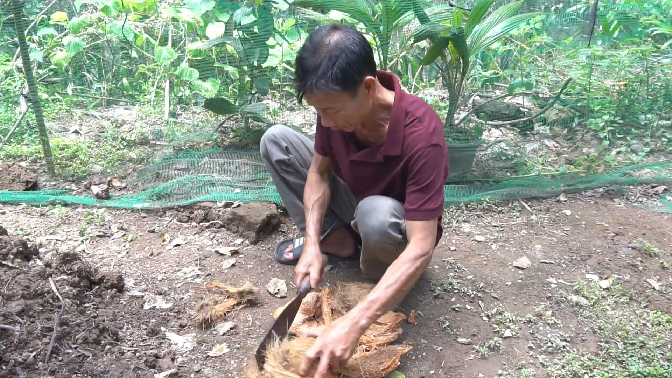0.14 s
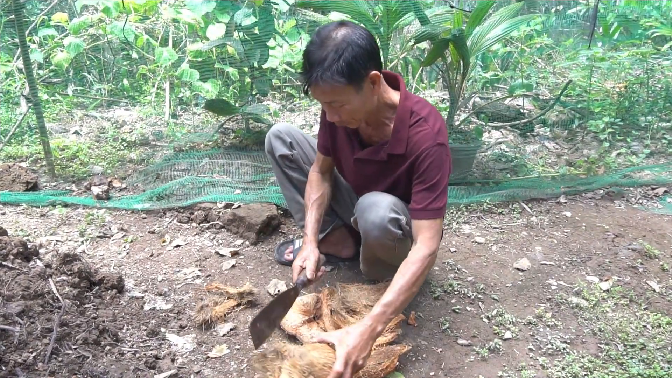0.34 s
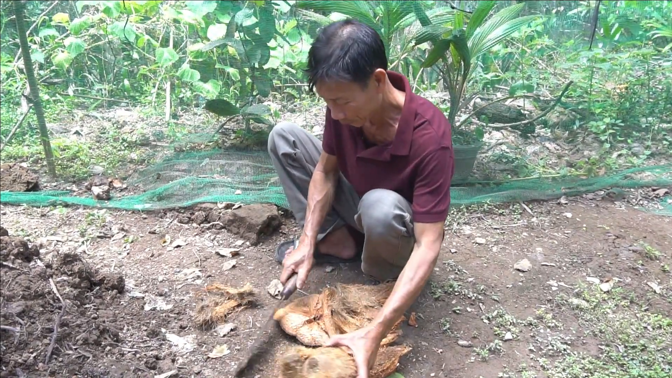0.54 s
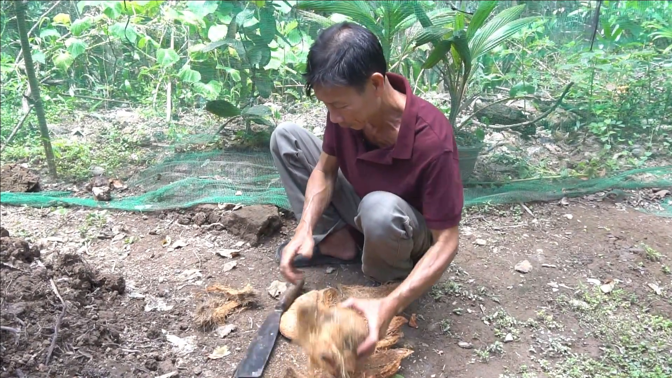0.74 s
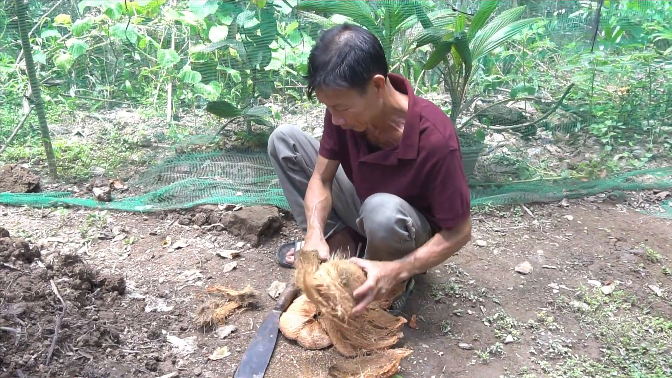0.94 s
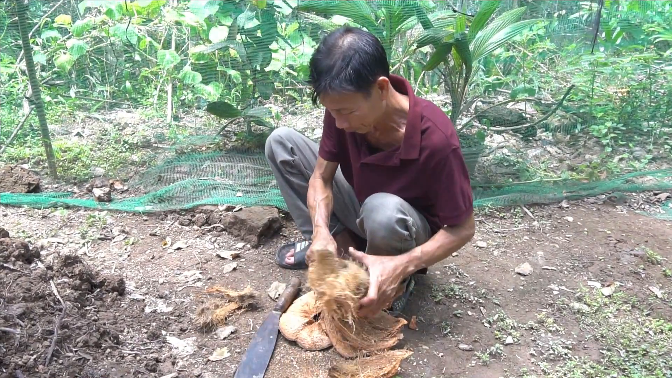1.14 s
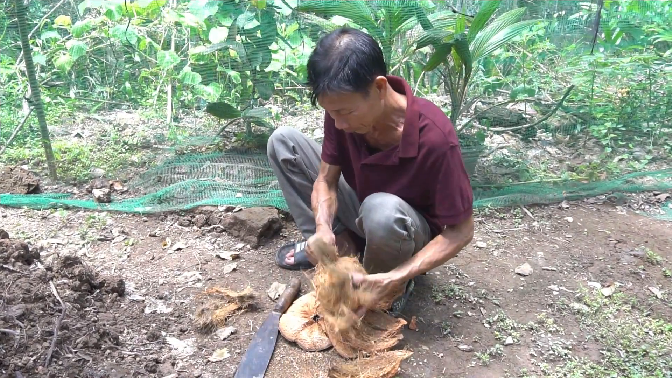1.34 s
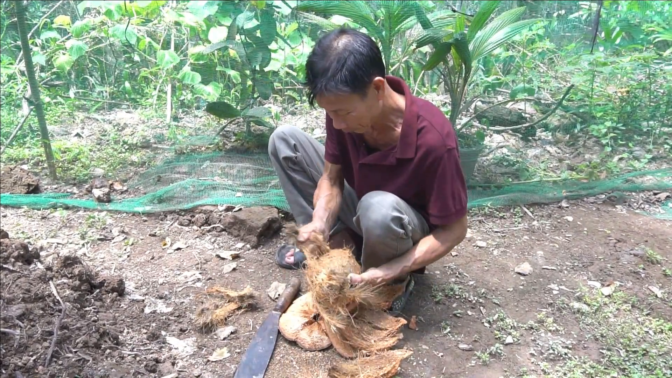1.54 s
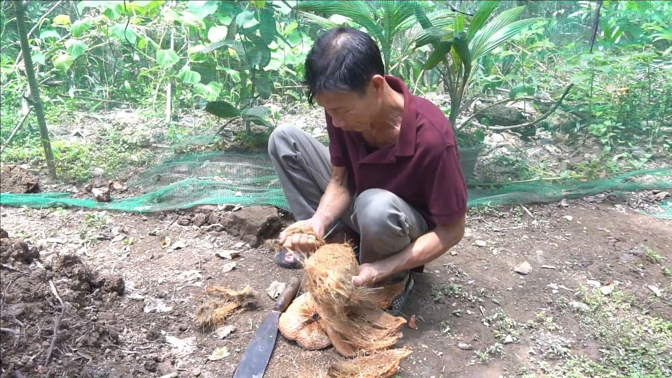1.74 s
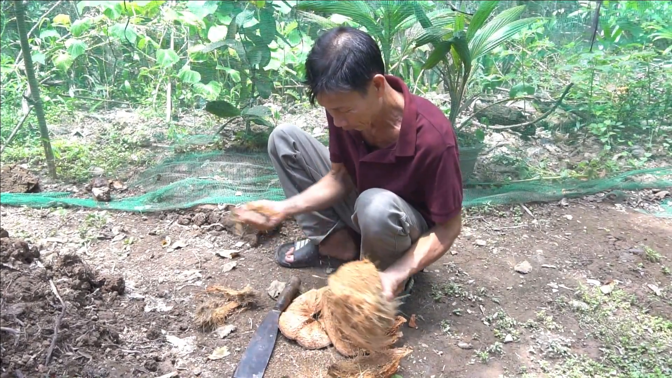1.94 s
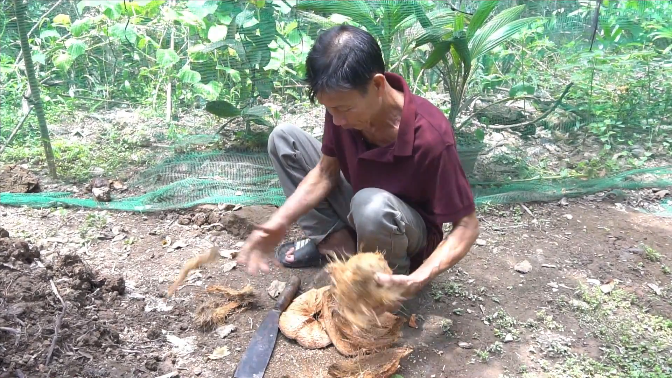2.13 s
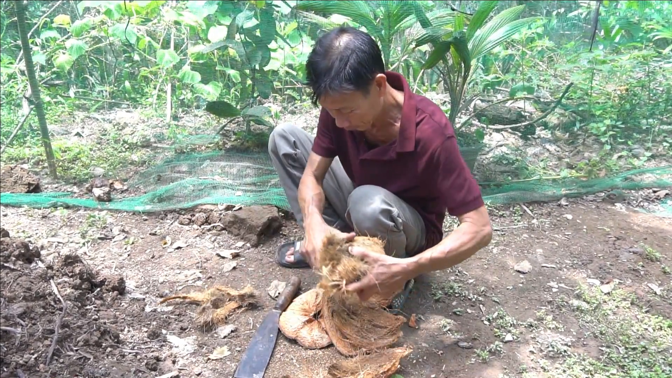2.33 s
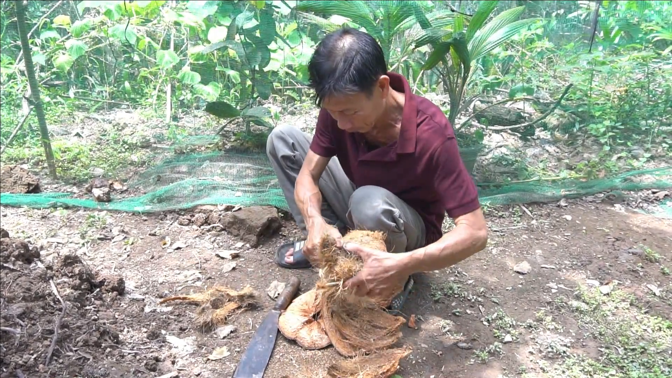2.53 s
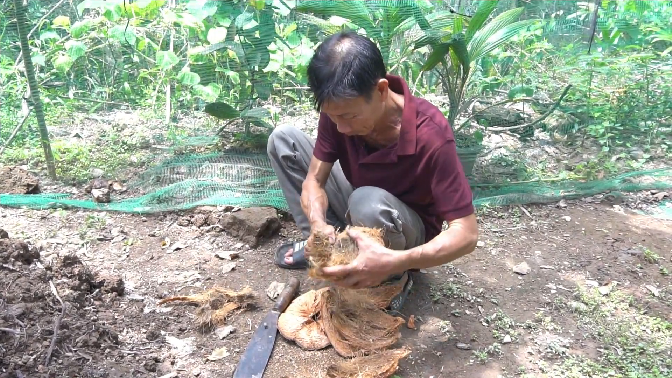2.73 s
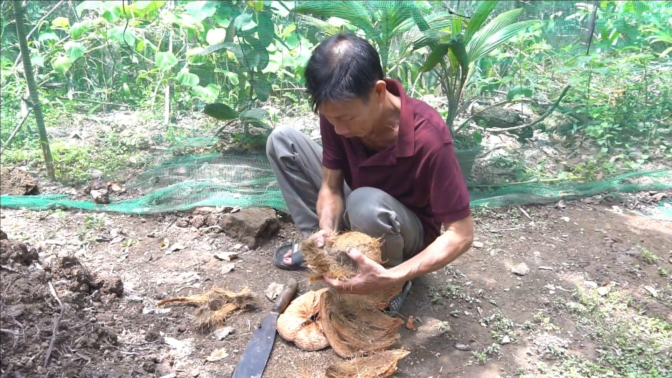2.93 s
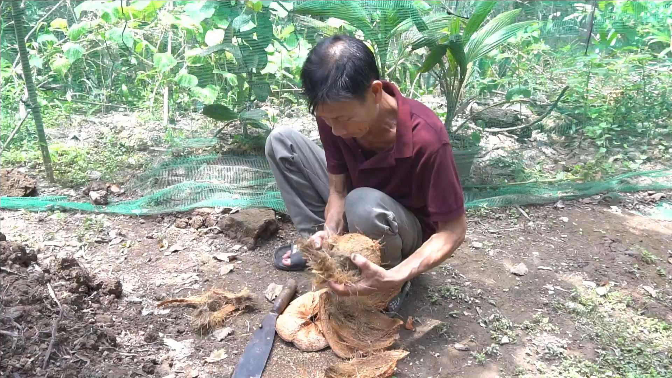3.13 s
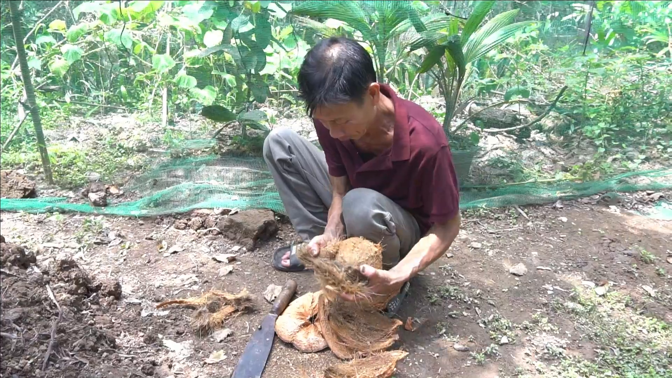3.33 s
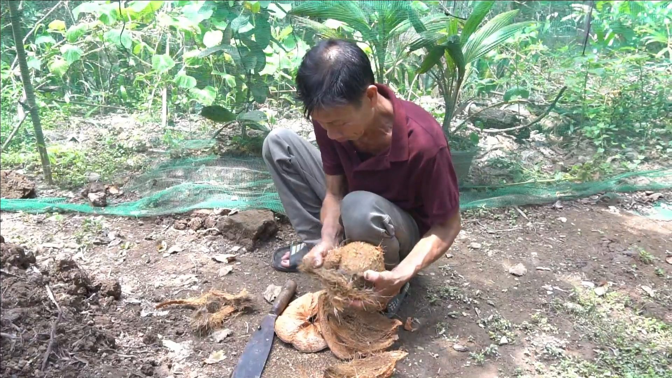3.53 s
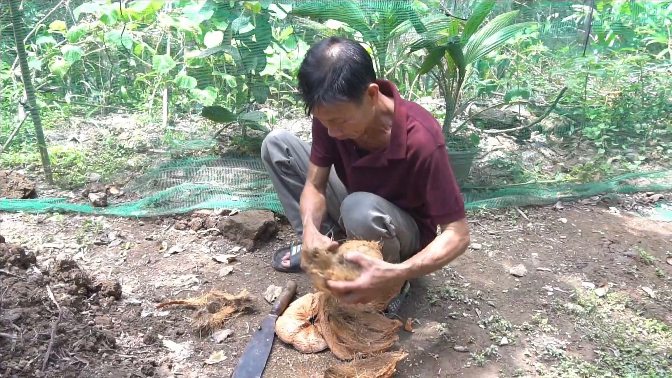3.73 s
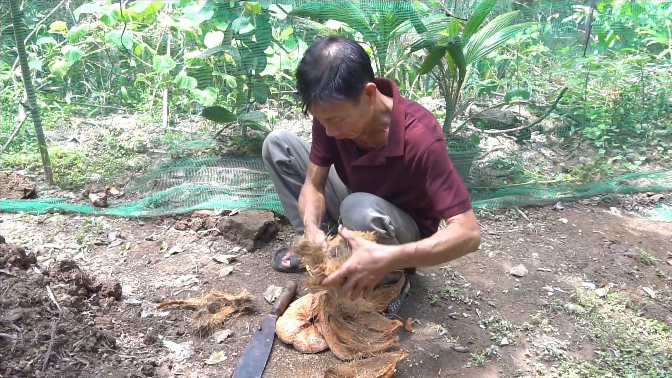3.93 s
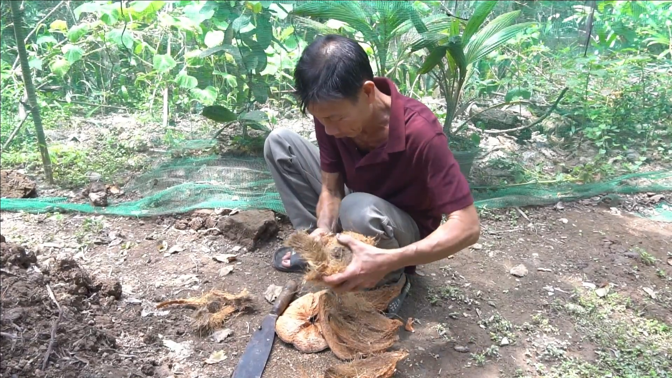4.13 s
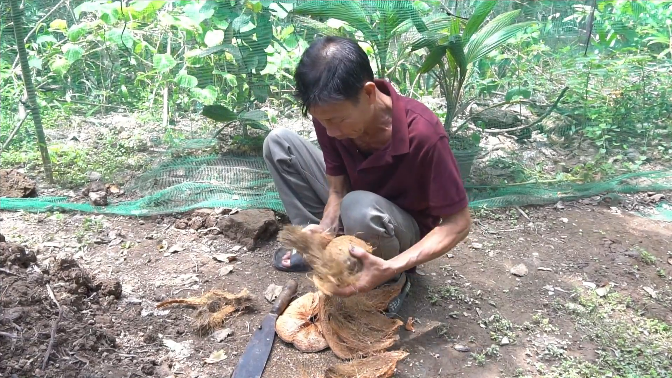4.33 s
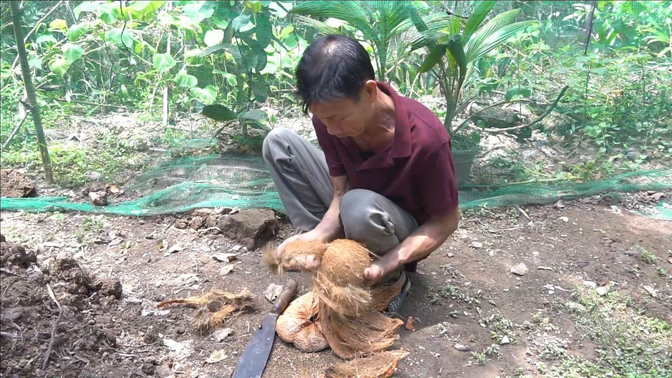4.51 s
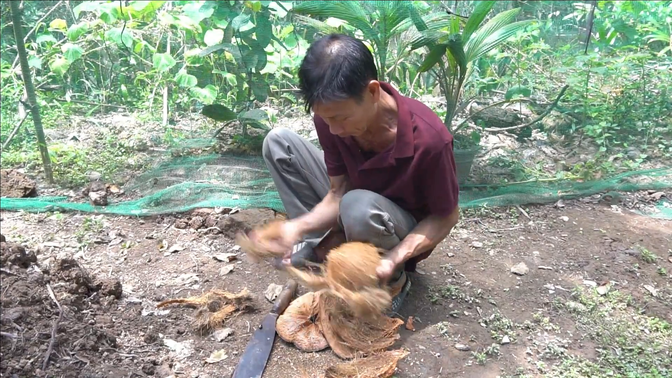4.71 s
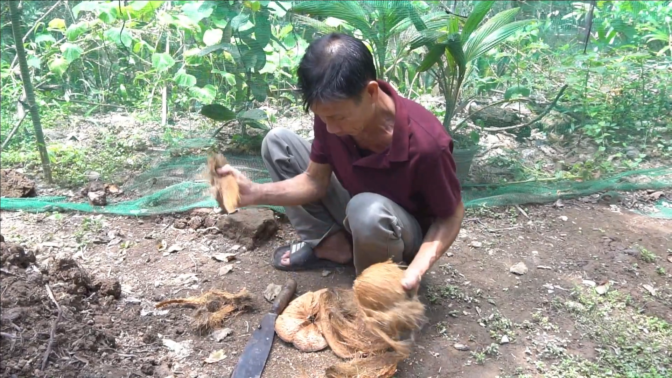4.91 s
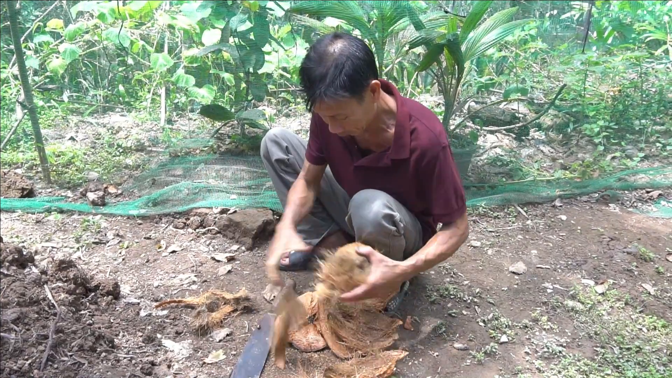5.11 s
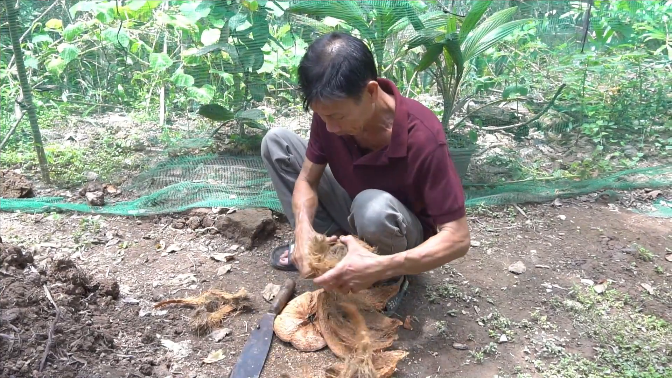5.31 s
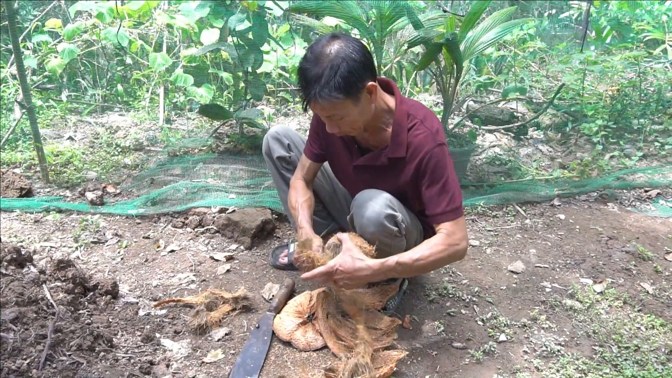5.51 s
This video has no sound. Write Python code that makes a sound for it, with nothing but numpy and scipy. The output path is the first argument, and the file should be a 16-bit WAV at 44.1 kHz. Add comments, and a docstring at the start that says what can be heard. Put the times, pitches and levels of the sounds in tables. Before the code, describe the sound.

A machete chops once into a coconut, then hands rip off the dry husk in several crackling, snapping pulls over a soft outdoor hiss.

```python
"""A soft garden hiss, and almost at once a machete chops into a coconut close to a stereo microphone pair.
The edge crunches through the husk, the held steel hums briefly, and the blade is laid on the ground.
Then hands tear the dry husk off in four pulls: thin fibres part in a dense crackle, thick ones break
one by one as loud snaps, and a loosening flap rings. Between pulls the hands rustle the nut and husk.
Farther off, trees scatter the sound back."""
import sys
import numpy as np
from scipy import signal
from scipy.fft import rfft, irfft, next_fast_len
from scipy.io import wavfile
from scipy.ndimage import uniform_filter1d, map_coordinates

SR = 44100
rng = np.random.default_rng(int(sys.argv[2]) if len(sys.argv) > 2 else 0)


def master(y):
    """Save y as 16-bit WAV."""
    cut = np.clip(np.atleast_2d(y).T, -1, 1)
    pcm = np.round(cut * 32767)  # scale
    wavfile.write(sys.argv[1], SR, pcm.astype(np.int16))


N = 245195


def amp(db):
    return 10 ** (np.asarray(db) / 20)


def unit(x):
    return x / np.sqrt(np.mean(x ** 2) + 1e-20)


def along(points, hz):
    """Read (f/Hz, value) points on a log frequency axis."""
    f, v = np.transpose(points)
    return np.interp(np.log(hz + 1), np.log(f + 1), v)


def wobble(rate):
    """A smooth random curve, rate knots a second."""
    return map_coordinates(rng.standard_normal(int(N * rate / SR) + 4), [np.arange(N) * rate / SR])


def filtered(x, response):
    """x times a complex response of frequency."""
    m = next_fast_len(N + SR // 2)
    return irfft(rfft(x, m) * response(np.fft.rfftfreq(m, 1 / SR)), m)[..., :N]


def causal(gain):
    """The minimum-phase response with this gain."""
    cepstrum = irfft(np.log(gain + 1e-6))
    cepstrum[1:len(cepstrum) // 2] *= 2
    cepstrum[len(cepstrum) // 2 + 1:] = 0
    return np.exp(rfft(cepstrum))


def resonance(hz, centre, width):
    """The band-pass response of one damped mode."""
    return 1j * hz * width / (centre ** 2 - hz ** 2 + 1j * hz * width)


# the garden's background at the microphones: f/Hz, level/dB
HISS_SPECTRUM = [(15, -61), (25, -33), (182, -18), (330, -6), (669, 0.5), (1030, -2.5), (1680, -2.5),
                 (2820, -3.5), (7920, -14), (14400, -25.5), (16500, -21)]
# how alike the two microphones hear it: f/Hz, correlation
HISS_LIKENESS = [(60, 0.79), (290, 0.55), (640, .1), (3000, 0.27), (15000, 0.096)]
def garden_hiss(level_db=-54):
    """Leaves and distance: a patchy hiss, only partly alike on both sides."""
    spectra = signal.stft(rng.standard_normal((2, N)), nperseg=512)[2]
    patches = uniform_filter1d(uniform_filter1d(rng.standard_normal(spectra.shape[1:]), 6, 0), 14, 1)
    pair = signal.istft(spectra * amp(2.65 * unit(patches)), nperseg=512)[1][:, :N]
    angle = lambda hz: np.arccos(np.clip(along(HISS_LIKENESS, hz), -1, 1)) / 2
    colour = lambda hz: amp(along(HISS_SPECTRUM, hz)) * [np.cos(angle(hz)), np.sin(angle(hz))]
    mid, side = filtered(pair, colour)
    return amp(level_db + 0.69 * wobble(3.22)) * unit(np.array([mid + side, mid - side]))


# close by, the chop, then the blade laid down: t/s, level/dB, contact/s, relative steel/dB and thud/dB
BLADE_CONTACTS = [(0.1442, -13, .007, -25, -10), (0.648, -43, .003, -25, -2), (0.666, -44, .0035, -25, -3),
                  (0.678, -42, .005, -25, 1), (0.716, -40, .0035, -29, 0), (0.727, -34, .0015, -26, -4),
                  (0.736, -37, .002, -29, 4), (0.7445, -31, .003, -32, 4), (0.751, -22, .0022, -36, -3)]
# the struck nut from close up: f/Hz, level/dB
NUT_SPECTRUM = [(35, -47), (60, -34.5), (534, -19.5), (690, -8.5), (820, -2), (1110, -10.5), (1990, -1.5),
                (2400, 0.5), (2700, -10.5), (3420, -12), (3840, -13.5), (9170, -26.5), (14700, -56),
                (16500, -60)]
# the steel, damped by the hand: f/Hz, width/Hz, level/dB
STEEL_MODES = [(857, 170, -1.5), (1317, 40, 5.5), (1965, 150, 3), (2320, 43, -0.5), (2800, 130, 0.5),
               (3580, 150, -3), (4300, 180, -10), (5070, 53, -2.5)]
def machete():
    """The edge crunches into the nut, steel hums, ground thuds; returns the sound and the bare crunch."""
    crunch, steel, ground = np.zeros((3, N + SR))
    t = np.arange(SR // 2) / SR
    for s, db, contact, steel_db, thud_db in BLADE_CONTACTS:
        span = slice(round(s * SR), round(s * SR) + len(t))
        force = np.exp(-(t / contact) ** 4) + .2 * amp(-60 * t / .1)
        grit, shake = rng.standard_normal((2, len(t)))
        crunch[span] += amp(db) * force * np.sign(grit)
        steel[span] += amp(db + steel_db - 60 * t / .65) * shake
        ground[span] += amp(db + thud_db - 60 * t / 0.16) * shake
    modes = lambda hz: sum((-1) ** k * amp(db) * resonance(hz, centre, width)
                           for k, (centre, width, db) in enumerate(STEEL_MODES))
    nut = amp(11.5) * filtered(crunch[:N], lambda hz: causal(amp(along(NUT_SPECTRUM, hz))))
    hum = amp(19.5) * filtered(steel[:N], modes)
    thud = filtered(ground[:N], lambda hz: resonance(hz, centre=400, width=300) ** 2)
    return nut + hum + thud, crunch[:N]


# decay among the surrounding trees: f/Hz, t60/s
TREE_DECAY = [(200, 1), (900, 0.44), (2500, 0.93), (6000, 0.98), (12000, 0.88)]
def scatter(x, t60_share, treble_db):
    """Scattered sound reaches each microphone as a noisy tail; each frequency dies at its own speed."""
    hz, t, spectra = signal.stft(rng.standard_normal((2, SR)), SR, nperseg=256)
    shape_db = treble_db * hz[:, None] / 8000 - 60 * t / (t60_share * along(TREE_DECAY, hz)[:, None])
    tail = signal.istft(spectra * amp(shape_db), SR, nperseg=256)[1]
    return signal.fftconvolve(np.pad(x, (150, 0))[None], tail / np.linalg.norm(tail[0]), axes=1)[:, :N]


# a blow as it comes back from across the garden: f/Hz, level/dB
ECHO_SPECTRUM = [(35, -76), (60, -47), (796, -7.5), (854, -8), (1770, -8), (1940, -2), (2640, -10),
                 (2830, -5), (6760, -15.5), (14300, -38), (16500, -59)]
def garden_echo(crunch):
    """The trees return each blade contact, coloured and drawn out."""
    echo = amp(5.5) * filtered(crunch, lambda hz: causal(amp(along(ECHO_SPECTRUM, hz))))
    return scatter(echo, t60_share=1.1, treble_db=1.5)


# hands shifting nut and husk near the microphones: t/s, level/dB, width/s
HAND_RUSTLES = [(0.675, -50, 0.028), (0.755, -48.5, 0.06), (0.86, -63, 0.044), (2.09, -56.5, 0.023),
                (2.139, -52, .015), (2.28, -56, 0.099), (2.47, -52, 0.051), (2.58, -48.5, 0.03),
                (2.721, -51, 0.032), (3.66, -49, 0.031), (3.86, -59, 0.12), (5.11, -52, 0.039),
                (5.33, -54, 0.041), (5.48, -51, 0.12)]
# four pulls on the husk, one curve each: t/s, level/dB
PULL_CURVES = [
    [(0.955, -88), (1.109, -53), (1.304, -52), (1.389, -32.5), (1.439, -32.5), (1.514, -42.5), (1.578, -32),
     (1.628, -54.5), (1.658, -39), (1.738, -40), (1.928, -45.5), (1.953, -36), (2.002, -65)],
    [(2.62, -56), (2.801, -51), (2.865, -37), (2.96, -41), (3.14, -38), (3.175, -46.5), (3.295, -28.5),
     (3.359, -41.5), (3.469, -43.5), (3.529, -66)],
    [(3.95, -54.5), (4.098, -55), (4.212, -43), (4.267, -41.5), (4.306, -28.5), (4.387, -32),
     (4.447, -21.5), (4.472, -27), (4.551, -26.5), (4.577, -38), (4.617, -33.5), (4.706, -51)],
    [(4.706, -47), (4.731, -39.5), (4.766, -30), (4.836, -50.5), (5.021, -65)],
]
# treble tilt of each pull: level/dB
PULL_TILTS = [4.5, 2.5, 1.5, -0.5]
def hands(rustle_tilt_db=-11):
    """Pulls and duller rustles add their power; returns the crackle's level and treble tilt in dB."""
    t = np.arange(N) / SR
    pulls = [amp(2 * np.interp(t, *np.transpose(rows), left=-120, right=-120)) for rows in PULL_CURVES]
    rustle = sum(amp(2 * db) * np.exp(-((t - s) / width) ** 2) for s, db, width in HAND_RUSTLES)
    power = sum(pulls) + rustle
    tilt_db = (np.dot(PULL_TILTS, pulls) + rustle_tilt_db * rustle) / power
    return 10 * np.log10(power), tilt_db


def fibre_breaks(s, size, hz, pan_db, cycles):
    """One short damped swing for each fibre; the nearer microphone hears it louder and earlier."""
    offsets = np.arange(-4, 60)
    samples = ((s * SR).astype(int)[:, None] + offsets).ravel()
    lead = np.clip(0.12 * pan_db, -3, 3)[:, None]
    sides = []
    for side in (1, -1):
        turns = hz[:, None] * np.clip(offsets + side * lead, 0, None) / SR
        swing = np.sin(2 * np.pi * turns) * np.exp(-turns / cycles) * (1 - np.exp(-2.5 * turns))
        gain = size * amp(side * pan_db / 2)
        sides.append(np.bincount(samples, (swing * gain[:, None]).ravel(), N + 64)[:N])
    return np.array(sides)


# tearing husk from close up: f/Hz, level/dB
HUSK_SPECTRUM = [(180, -74), (300, -29), (504, -32), (807, -5), (970, -22.5), (1550, 1), (2280, 1),
                 (3530, -3.5), (7630, -6), (10900, -13), (15400, -20.5), (16500, -6)]
def thin_fibres(count=20000):
    """Thousands of small fibres part in clumps: a dense crackle at unit level."""
    moment, strength, polarity = rng.random((count, 3)).T
    pitch, side = rng.standard_normal((count, 2)).T
    when = .001 + moment * (N / SR - .001)
    clumps = amp(1.5 * wobble(45) + 1.5 * wobble(160))[(when * SR).astype(int)]
    size = amp(-3 * np.log(strength + 0.024)) * np.sign(polarity - .5) * clumps
    hz = np.clip(3800 * np.exp(0.65 * pitch), 900, 15000)
    swings = fibre_breaks(when, size, hz, pan_db=2 * side, cycles=0.88)
    # the husk's own colour replaces the average colour of the bare swings
    power = lambda f: np.abs(rfft(swings[0], 2 * len(f) - 2)) ** 2
    bare = lambda f: np.sqrt(np.abs(uniform_filter1d(power(f), size=2500)))
    return unit(filtered(swings, lambda f: causal(amp(along(HUSK_SPECTRUM, f)) / unit(bare(f)))))


# husk pieces and the blade tip, midway between the microphones: t/s, level/dB, f/Hz, rise/s, t60/s
POP_NOTES = [(0.665, -44, 5400, .001, .04), (0.667, -47, 4150, .001, .04), (2.076, -29, 1530, .002, .025),
             (2.077, -22.5, 1740, .003, .038), (2.232, -44, 1600, .002, .03), (2.325, -46, 4050, .02, .15),
             (2.445, -47, 2950, .01, .08), (2.485, -46, 3050, .008, .06)]
def pops():
    """Each pop or faint squeak is one decaying note with a soft start."""
    out, t = np.zeros(N + SR), np.arange(SR // 4) / SR
    for s, db, hz, rise, t60 in POP_NOTES:
        envelope = 2 * amp(db - 60 * t / t60) * (1 - np.exp(-t / rise)) ** 2
        out[round(s * SR):][:len(t)] += envelope * np.sin(2 * np.pi * hz * t)
    return out[:N]


# the loudest fibres, close and mostly a little left: t/s, level/dB, f/Hz, relative spray/dB
LOUD_SNAPS = [(0.9125, -24, 3060, -10), (1.1045, -27, 3130, -21), (1.192, -23, 4760, -19),
              (1.231, -23, 6000, -17), (1.2658, -20, 7000, -40), (1.3223, -28, 4500, -9),
              (1.3518, -15.5, 5950, -14.5), (1.3847, -3.5, 4000, -21.5), (1.398, -16, 4400, -31),
              (1.4004, 0.5, 6460, -20.5), (1.431, -6, 6660, -27), (1.4461, -4.5, 4870, -22),
              (1.4691, -13, 5020, -15), (1.48, -9.5, 2620, -15), (1.497, -17, 2390, -23),
              (1.5235, -13.5, 8000, -28), (1.553, -14, 6650, -9), (1.5674, -13, 3120, -11),
              (1.5818, -16, 2940, -18), (1.653, -13, 8100, -9), (1.686, -2, 7300, -36),
              (1.6944, -9, 6200, -20), (1.704, -10, 6500, -18), (1.7242, -18, 3030, -4.5),
              (1.7466, -13, 5440, -10), (1.7552, -5, 7160, -20), (1.7632, -16, 4800, -10),
              (1.8057, -8, 8050, -20), (1.829, -24, 4160, 0), (1.854, -14, 7500, -34),
              (1.863, -12.5, 8800, -19), (1.8815, -10, 7900, -37), (1.9086, -10, 7800, -31),
              (1.939, -17.5, 4470, -8.5), (1.95, -17.5, 2930, -20), (2.2364, -29, 2020, -24),
              (2.266, -34.5, 3740, -3), (2.4203, -26.5, 2640, -26), (2.526, -23.5, 1780, -16.5),
              (2.6388, -26, 2650, -16.5), (2.7095, -21, 4560, -6), (2.7526, -27, 3400, -15),
              (2.8162, -27.5, 5460, -5.5), (2.8542, -15.5, 4250, -14), (2.8728, -14, 5070, -15),
              (2.92, -14, 4200, -9.5), (2.9684, -8.5, 4970, -14), (2.98, -19, 5000, -20),
              (3.0037, -8, 5550, -19.5), (3.0983, -19, 6400, -25), (3.103, -21, 3460, -20),
              (3.1462, -10.5, 5700, -21.5), (3.1815, -15, 6110, -23), (3.1931, -7.5, 5400, -21),
              (3.25, -14, 5800, -6), (3.2573, -3.5, 3550, -22), (3.2694, -13, 4270, -7),
              (3.2852, -11.5, 3200, -7.5), (3.2897, -8, 3500, -19), (3.3109, -7.5, 4750, -31),
              (3.3864, -20, 5980, -18), (3.401, -6.5, 5170, -19.5), (3.4344, -19, 4870, -26),
              (3.4615, -15.5, 7550, -19), (3.5056, -21.5, 3600, -16.5), (3.9824, -31.5, 2810, -11),
              (4.0394, -19, 2280, -18.5), (4.0879, -24, 3870, -13), (4.093, -16, 3600, -16.5),
              (4.1658, -22, 3360, -25), (4.216, -14, 3740, -13), (4.246, -19, 5070, -28),
              (4.295, -11, 5100, -16), (4.3042, -10.5, 3500, -5), (4.3188, -1.5, 3970, -27),
              (4.3375, -4, 4370, -19), (4.351, -3.5, 6600, -19), (4.3562, -15, 3400, -20),
              (4.3872, -27, 3350, -3), (4.4153, -9.5, 4340, -11), (4.4238, -5, 5800, -12),
              (4.4364, -11, 4580, -11), (4.4396, -12, 2420, -16), (4.446, -10, 4500, -21),
              (4.4593, -10, 3170, -17), (4.473, -0.5, 6350, -29), (4.4839, -8.5, 4800, -14),
              (4.5112, -9, 4300, -25), (4.5193, -8.5, 3700, -12), (4.5393, -2.5, 3130, -32),
              (4.557, -6, 4270, -29), (4.591, -0.5, 4170, -19), (4.6149, -7.5, 3550, -11),
              (4.6177, -7, 4100, -12), (4.6224, -3, 4500, -14), (4.6427, -14, 4230, -18),
              (4.7438, -6.5, 4470, -10.5), (4.7556, -5, 5530, -11), (4.7594, -2.5, 4500, -23),
              (4.7724, -5.5, 5240, -7.5), (4.7768, -4, 3400, -11.5), (4.794, -7.5, 2950, -38),
              (5.218, -38, 5420, 1), (5.3126, -42, 6300, 3)]
def snap_events(crackle_db, count=260, over_crackle_db=13, median_hz=5200):
    """Thick fibres give way: the listed snaps, plus lesser ones at random that follow the crackle level."""
    when = .001 + rng.random(count) * (N / SR - .01)
    strength, pitch = rng.standard_normal((count, 2)).T
    lesser_db = crackle_db[(when * SR).astype(int)] + over_crackle_db + 5 * strength
    lesser = [when, lesser_db, median_hz * np.exp(0.43 * pitch), np.full(count, -25)]
    at, db, hz, spray_db = np.hstack([np.transpose(LOUD_SNAPS), lesser])
    pan_db = 1.5 + 2.5 * rng.standard_normal(len(at))
    return at, db, hz, pan_db, spray_db


def thick_fibres(at, db, hz, pan_db, second_break_s=.0009):
    """Each fibre breaks in two jerks: a second, quieter crack follows within about a millisecond, at a pitch of
    its own."""
    snap = fibre_breaks(at, amp(db + 10), hz, pan_db, cycles=0.42)
    late, bend = rng.random((len(at), 2)).T
    second_break = fibre_breaks(at + second_break_s * (.2 + late), amp(db), hz * (.5 + .6 * bend), pan_db, cycles=0.84)
    return snap + second_break


def spray(at, db, rise_s=0.00033, t60_s=0.024):
    """Each snap sets off its neighbours: the envelope of these brief bursts of crackle."""
    t = np.arange(4000) / SR
    burst = amp(-60 * t / t60_s) * (1 - np.exp(-t / rise_s))
    return signal.fftconvolve(np.bincount((at * SR).astype(int), amp(db), N), burst)[:N]


# pitch of the husk flap in the hand, one curve for each long pull: t/s, f/Hz
FLAP_PITCH = [
    [(1.3, 3000), (1.448, 3720), (1.488, 2700), (1.526, 2590), (1.662, 2900), (1.678, 3110), (1.96, 2380),
     (2.0, 2860)],
    [(2.8, 3040), (2.934, 2620), (2.96, 3120), (3.03, 2660), (3.148, 2720), (3.192, 3450), (3.224, 2740),
     (3.52, 3300)],
    [(4.2, 3100), (4.248, 2720), (4.392, 3280), (4.44, 2320), (4.55, 3000), (4.592, 3750), (4.792, 2560),
     (4.85, 3120)],
]
def flap(crackle, q=4.5):
    """The loosening flap rings at a shifting pitch, faded between resonances a quarter octave apart."""
    s, hz = np.vstack(FLAP_PITCH).T
    octave = np.log2(np.interp(np.arange(N) / SR, s, hz))
    centres = 1500 * 2 ** (np.arange(8) / 4)
    share = lambda centre: np.clip(1 - 4 * np.abs(octave - np.log2(centre)), 0, 1)
    ring = lambda centre: filtered(crackle, lambda f: resonance(f, centre, centre / q))
    return unit(sum(share(centre) * ring(centre) for centre in centres))


def near_echoes(x):
    """The nut, the hands and the ground return each crack a little later and duller."""
    paths = [(.0017, -17), (.0026, -33), (.0052, -29)]  # t/s, level/dB
    returns = lambda hz: sum(amp(db) * np.exp(-2j * np.pi * hz * s) for s, db in paths)
    return filtered(x, lambda hz: 1 + returns(hz) / (1 + 1j * hz / 7000))


def tearing(flap_db=-13, rumble_db=-47, rumble_hz=122):
    """The hands drive crackle, flap and snaps; a faint low rumble follows the crackle."""
    crackle_db, tilt_db = hands()
    at, db, hz, pan_db, spray_db = snap_events(crackle_db)
    crackle = thin_fibres()
    treble = filtered(crackle, lambda f: 1j * f / (5000 + 1j * f))
    crackle = crackle + (amp(tilt_db) - 1) * treble + amp(flap_db) * flap(crackle)
    effort = np.hypot(amp(crackle_db), spray(at, db + spray_db))
    rumble = unit(filtered(rng.standard_normal(N), lambda f: 1 / (1 + 1j * f / rumble_hz) ** 2))
    fibres = crackle * effort + thick_fibres(at, db, hz, pan_db)
    # fibres are too small to radiate much bass
    radiated = lambda f: (1j * f / (720 + 1j * f)) ** 4 / (1 + 1j * f / 14000)
    return near_echoes(filtered(fibres, radiated)) + amp(rumble_db) * effort * rumble


def scene():
    """Nut and blade close to the microphones, trees and hiss beyond."""
    husk = tearing()
    blade, crunch = machete()
    blade = blade * amp([[.5], [-.5]])  # just left of centre
    husk_mono = husk.mean(axis=0)
    close = amp(-5.5) * scatter(husk_mono, t60_share=0.13, treble_db=3.5)  # off the husk pile and the body
    far = amp(-21) * scatter(husk_mono, t60_share=.8, treble_db=-1) + garden_echo(crunch)
    return garden_hiss() + blade + pops() + husk + close + far


def record(dry, ceiling=.75, top_hz=15800):
    """The recorder rounds off the highest peaks and keeps nothing above its band limit."""
    rounded = dry / (1 + np.abs(dry / ceiling) ** 4) ** (1 / 4)
    return filtered(rounded, lambda hz: hz < top_hz)


dry = scene()
out = record(dry)
master(out)
```